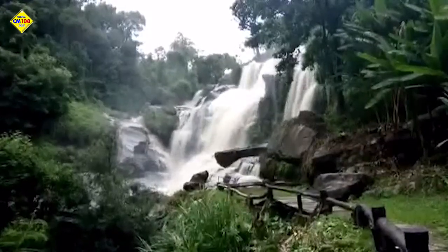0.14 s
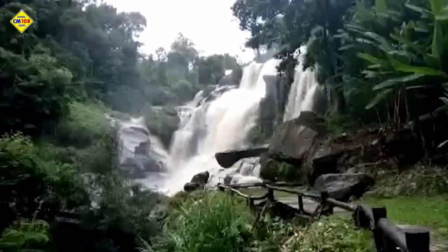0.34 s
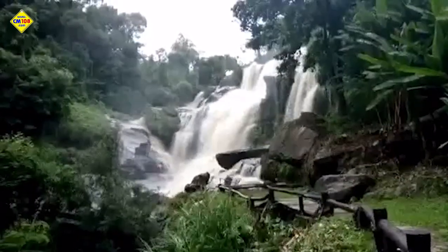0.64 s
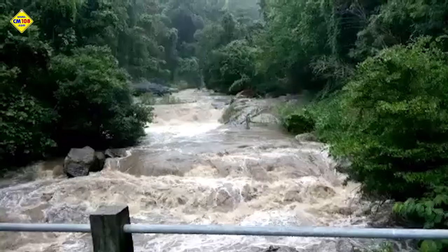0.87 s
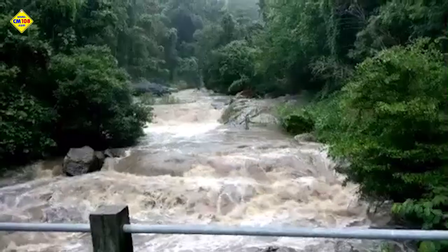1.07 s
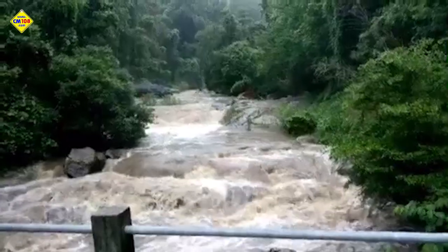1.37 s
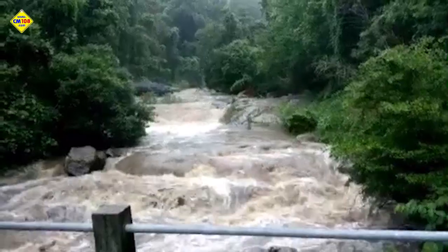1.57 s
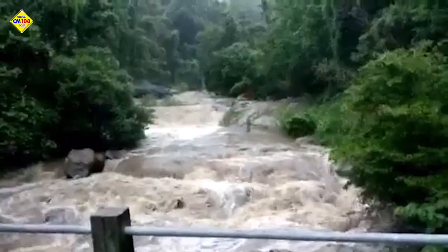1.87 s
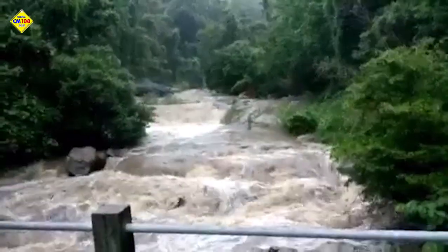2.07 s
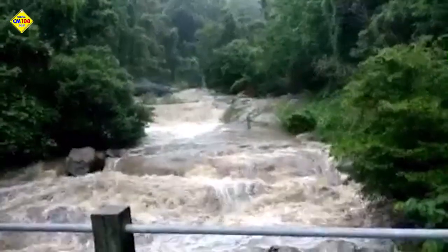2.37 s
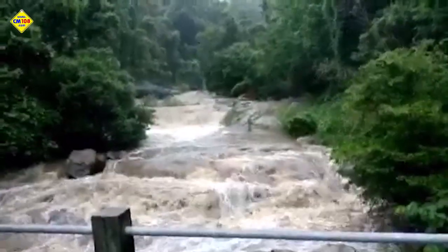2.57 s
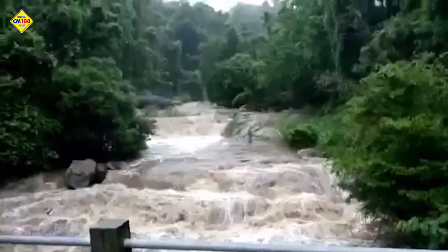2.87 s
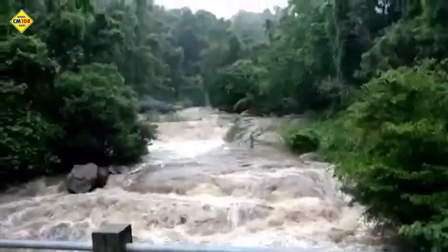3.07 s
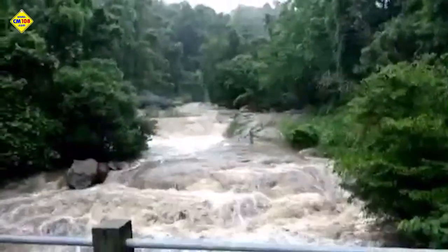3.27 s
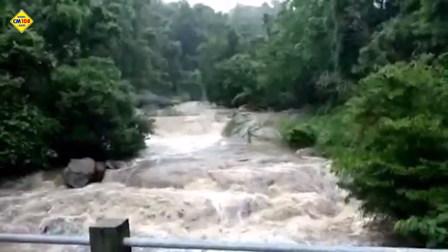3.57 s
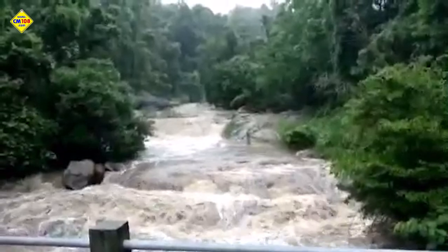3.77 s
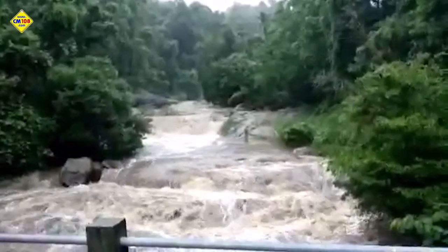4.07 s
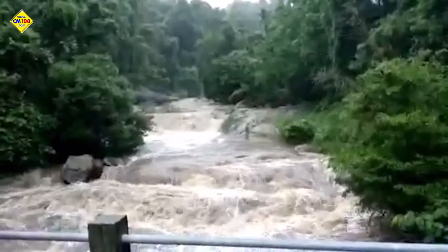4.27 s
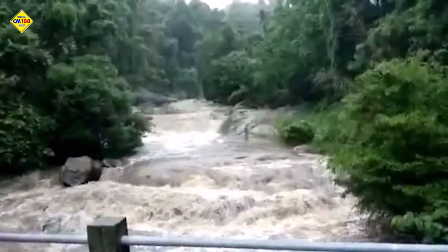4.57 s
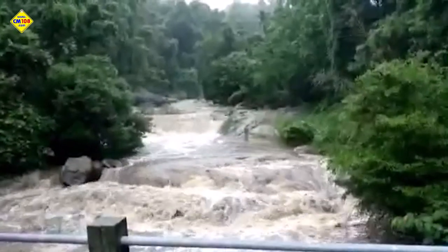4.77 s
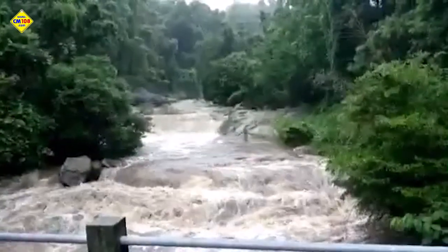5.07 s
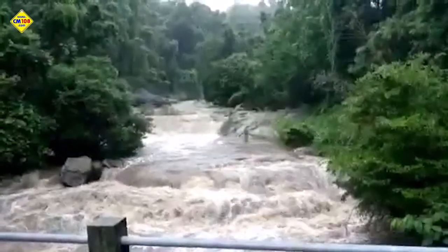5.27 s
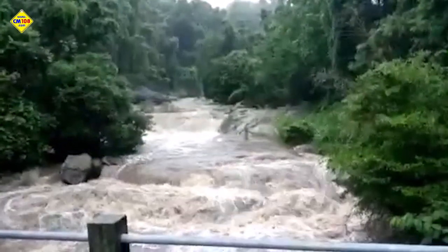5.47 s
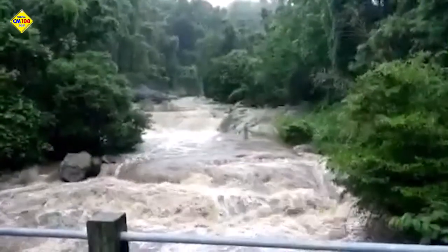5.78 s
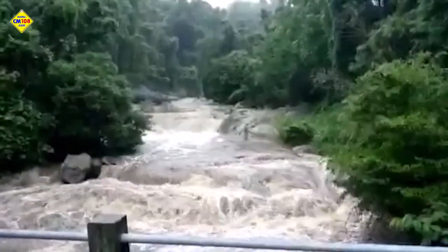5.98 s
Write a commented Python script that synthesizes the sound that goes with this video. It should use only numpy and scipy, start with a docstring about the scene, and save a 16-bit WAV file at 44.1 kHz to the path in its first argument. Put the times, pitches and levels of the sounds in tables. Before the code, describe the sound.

First, quiet muffled waterfall noise from far away, smooth and slightly wavering. Then a hard change of place: flooded rapids rush over rocks close by, loud, dense and continuous, with fine bubbling gurgles inside the roar and a bright, brittle spray on top. The rush stays nearly constant, easing imperceptibly, and is cut off still flowing. Outdoors, dry, centred, through a small phone-like microphone.

```python
"""A forested mountain valley in flood, heard from two places through a small mono microphone.
From far off, a waterfall rumbles softly: steady noise, dulled, wavering slightly and swelling once.
Then, close by, a swollen stream rushes over rocks: churning noise and swarms of ringing bubbles
make its roar, and showers of clicks over a noise mist make a spray, sharp with the microphone's
resonance near 5 kHz. The waterfall stays beneath as a faint murmur."""
import sys
import numpy as np
from scipy import signal
from scipy.fft import rfft, irfft, next_fast_len
from scipy.io import wavfile

SR = 44100
rng = np.random.default_rng(int(sys.argv[2]) if len(sys.argv) > 2 else 0)


def store_wav(level_fs):
    """Save 16-bit WAV to argv[1]."""
    pcm = np.round(np.clip(np.atleast_2d(level_fs), -1, 1) * 32767)
    wavfile.write(sys.argv[1], SR, pcm.T.astype(np.int16))


N = 270333
TIME = np.arange(N) / SR  # [s]
FALL_END_S, STREAM_START_S = 0.875, 0.897  # the far place has dropped to a murmur, the close one starts


def from_db(db):
    """Decibels to gain."""
    return 10 ** (np.asarray(db) / 20)


def rms_one(x):
    """Scale to unit power."""
    return x / np.sqrt(np.mean(x ** 2) + 1e-20)


def filtered(x, gain_at):
    """Apply a gain that is given as a function of frequency."""
    size = next_fast_len(N + SR // 10, real=True)  # padded, so that the end does not wrap round
    hz = np.maximum(np.arange(size // 2 + 1) * SR / size, 1)
    return irfft(rfft(x, size) * gain_at(hz), size)[:N]


def coloured(x, colour):
    """Shape a signal with a curve of (frequency [Hz], level [dB]) points; rms 1."""
    points_hz, points_db = np.transpose(colour)

    def gain_at(hz):
        return from_db(np.interp(np.log(hz), np.log(points_hz), points_db))

    return rms_one(filtered(x, gain_at))


def low_pass(x, edge_hz):
    """A very steep treble cut."""
    return filtered(x, lambda hz: 1 / np.sqrt(1 + (hz / edge_hz) ** 100))


def drift(rate):
    """Smooth random wandering at about this many changes a second; spread 1."""
    step = 40  # samples between the slow values
    r = np.exp(-2 * np.pi * rate * step / SR)
    settle = 2000  # slow values dropped while the filter settles
    noise = rng.standard_normal(N // step + settle + 2)
    slow = rms_one(signal.lfilter([1], [1, -2 * r, r * r], noise)[settle:])
    return np.interp(np.arange(N) / step, np.arange(len(slow)), slow)


def swell(peak_s, attack_s, release_s):
    """A straight rise from 0 to 1 and a straight fall back."""
    return np.interp(TIME, [peak_s - attack_s, peak_s, peak_s + release_s], [0, 1, 0])


# Colour of the waterfall from far off: (frequency [Hz], level [dB per Hz])
FALL_SPECTRUM = [(26, -57.5), (45, -22.5), (64, -24), (101, -11.5), (184, -0.5), (239, -4.5), (355, -7),
                 (420, -10.5), (498, -7), (647, -5.5), (842, -11.5), (1020, -10), (1350, -13.5),
                 (3440, -15.5), (4000, -21.5), (5200, -53), (8800, -120)]


def waterfall():
    """Distance blurs the falling water into a smooth, dull rumble."""
    rumble = coloured(rng.standard_normal(N), FALL_SPECTRUM)
    waver_db = 0.6 * drift(9)
    swell_db = 2.5 * swell(peak_s=0.704, attack_s=0.025, release_s=0.17)
    level_db = -60.5 + waver_db + swell_db
    return from_db(level_db) * low_pass(rumble, edge_hz=4050)


def impacts(per_s, spread_db):
    """Random clicks, many small and a few large."""
    sizes = from_db(spread_db * np.minimum(rng.exponential(1, N), 4))
    return sizes * (rng.random(N) < per_s / SR)


def drops(per_s, spread_db):
    """Impacts of either sign."""
    return impacts(per_s, spread_db) * rng.choice([-1, 1], N)


def splashes(per_s, spread_db, fade_s):
    """Wave crests break at once and die away: the envelope of their summed power, rms 1."""
    crest_power = impacts(per_s, spread_db) ** 2 + 1e-18
    power = signal.lfilter([1], [1, -np.exp(-1 / (fade_s * SR))], crest_power)
    return rms_one(np.sqrt(power))


def bubbles(per_s, cycles, low_hz, high_hz, count):
    """Trapped air pockets of many sizes, each ringing down 60 dB in some cycles; even power per Hz."""
    clicks = drops(per_s, spread_db=1.5)
    dealt = rng.integers(0, count, N)  # which pocket size each click sets ringing
    out = 0
    for k, hz in enumerate(np.geomspace(low_hz, high_hz, count)):
        r = np.exp(-np.log(1000) * hz / (cycles * SR))
        w = 2 * np.pi * hz / SR
        struck = clicks * (dealt == k) + 1e-18
        ringing = signal.lfilter([0, np.sin(w)], [1, -2 * r * np.cos(w), r * r], struck)
        out = out + hz * ringing
    return rms_one(out)


# Colour of the churning water close by: (frequency [Hz], level [dB per Hz])
ROAR_SPECTRUM = [(50, -19.5), (105, -2.5), (135, -2.5), (230, 0.5), (450, -3.5), (680, -1), (950, -5),
                 (1400, -2.5), (1750, -4), (2050, -2), (2330, -7.5), (2650, -9), (3100, -15), (7500, -43.5)]


def roar(breaking):
    """Churning foam, a swarm of bubbles as the crests break, and sparser, longer-ringing gurgles."""
    foam = rng.standard_normal(N) * from_db(0.23 * drift(12))
    swarm = bubbles(per_s=2500, cycles=12, low_hz=203, high_hz=2960, count=28) * breaking
    gurgles = bubbles(per_s=220, cycles=41, low_hz=448.4, high_hz=2800, count=48)
    foam, swarm, gurgles = (coloured(part, ROAR_SPECTRUM) for part in (foam, swarm, gurgles))
    return rms_one(foam + from_db(-9.5) * swarm + from_db(-10) * gurgles)


# Colour of the close spray as the microphone hears it, with the microphone's resonance near 5 kHz:
# (frequency [Hz], level [dB per Hz])
SPRAY_SPECTRUM = [(300, -25.5), (1500, -16.5), (3200, -17.5), (3900, -9.5), (4500, -3.5), (4950, 0.5),
                  (5200, 1.5), (6000, -9), (6700, -17), (7400, -22.5), (7900, -40)]


def spray(breaking):
    """Each splash throws a shower of fine drops, over a steady mist of bursting foam."""
    shower = rms_one(drops(per_s=7000, spread_db=2.0)) * breaking
    mist = from_db(4.5) * rng.standard_normal(N)
    flicker = from_db(0.29 * drift(14))
    return coloured((shower + mist) * flicker, SPRAY_SPECTRUM)


def stream():
    """The rapids fade in, then rush on; the same breaking crests drive both roar and spray."""
    age_s = TIME - STREAM_START_S
    fade_in_s, fade_in_depth_db = 0.18, 7.0
    ebb_db_per_s = 0.07  # the rush eases very slowly
    level_db = -fade_in_depth_db * np.clip(1 - age_s / fade_in_s, 0, 1) - ebb_db_per_s * age_s
    # The roar comes in a little louder, then settles
    overshoot_db = 1.3 * swell(STREAM_START_S + fade_in_s, fade_in_s, release_s=0.45)
    roar_db = -32.5 + overshoot_db
    spray_db = -30 + 0.17 * drift(1.8)  # slow random surges
    breaking = splashes(per_s=170, spread_db=1.5, fade_s=0.013)
    rapids = from_db(roar_db) * roar(breaking) + from_db(spray_db) * spray(breaking)
    return from_db(level_db) * rapids


def scene():
    """The far place drops to a faint murmur that stays beneath; a blink later the close one starts."""
    far = np.clip((FALL_END_S - TIME) / 0.002, from_db(-26.0), 1)
    close = np.clip((TIME - STREAM_START_S) / 0.0037, 0, 1)
    mono = far * waterfall() + close * stream()
    return np.tile(mono, (2, 1))  # both ears hear the same


def record(dry):
    """The recorder passes almost nothing above its cut-off."""
    return np.array([low_pass(channel, edge_hz=7850) for channel in dry])


dry = scene()
out = record(dry)
store_wav(out)
```